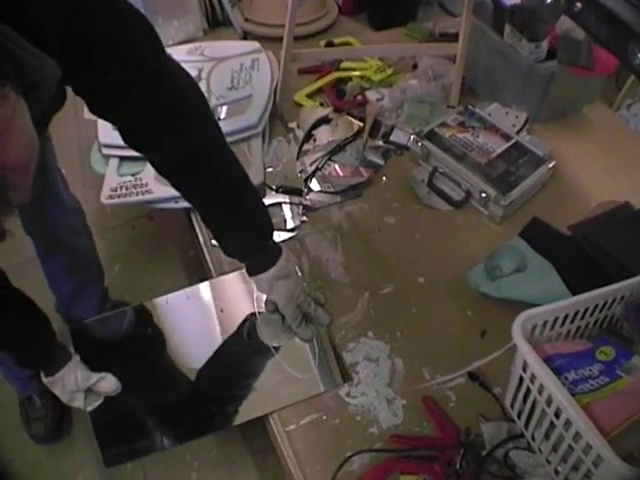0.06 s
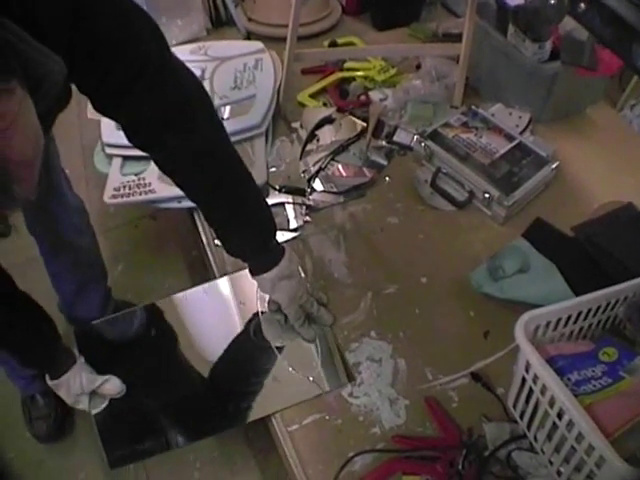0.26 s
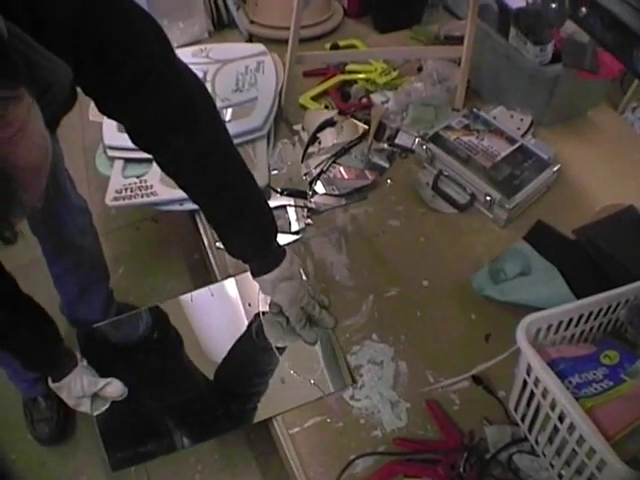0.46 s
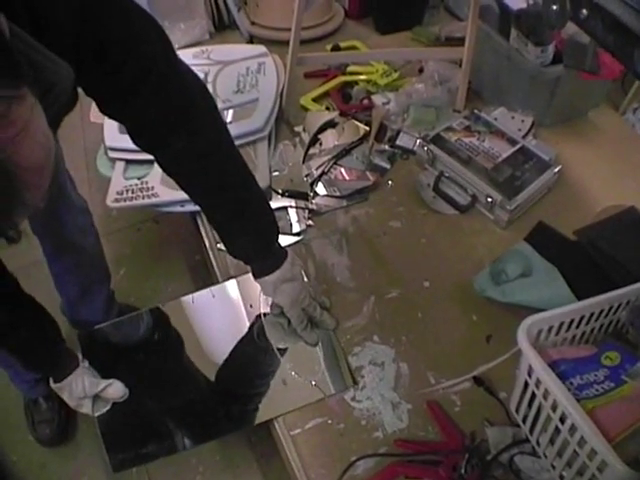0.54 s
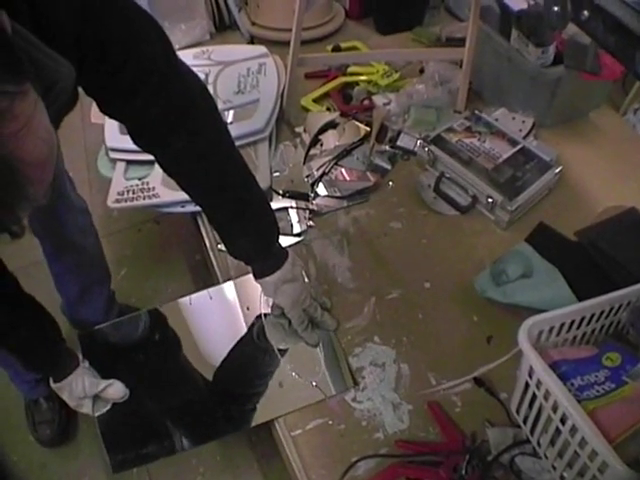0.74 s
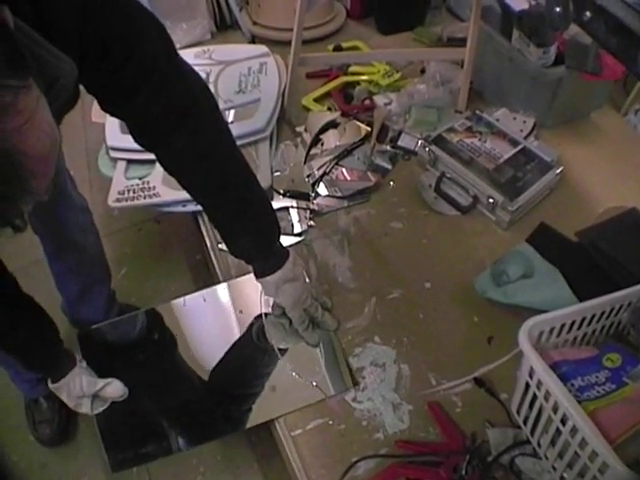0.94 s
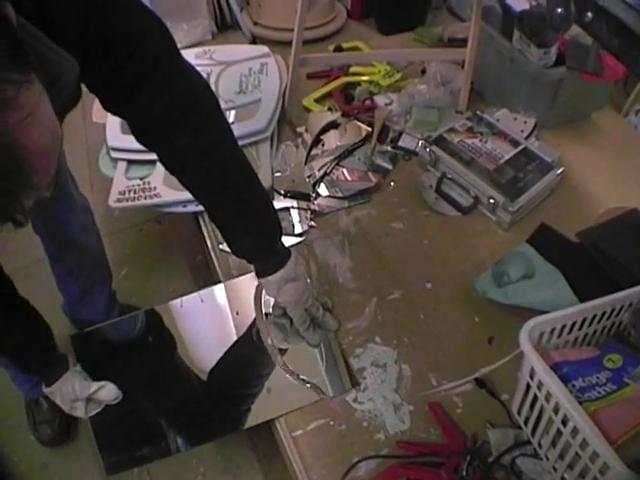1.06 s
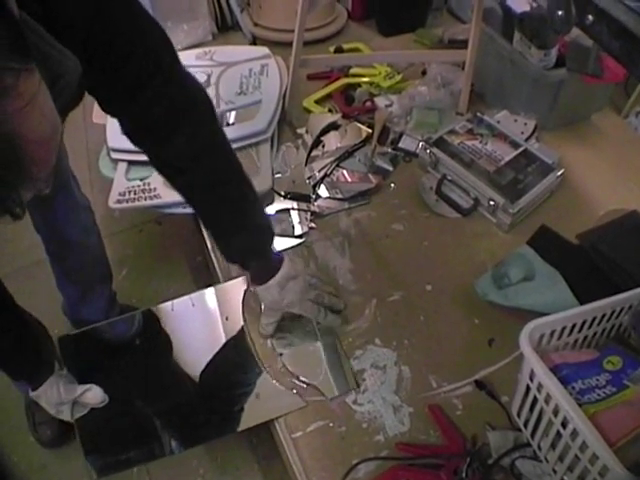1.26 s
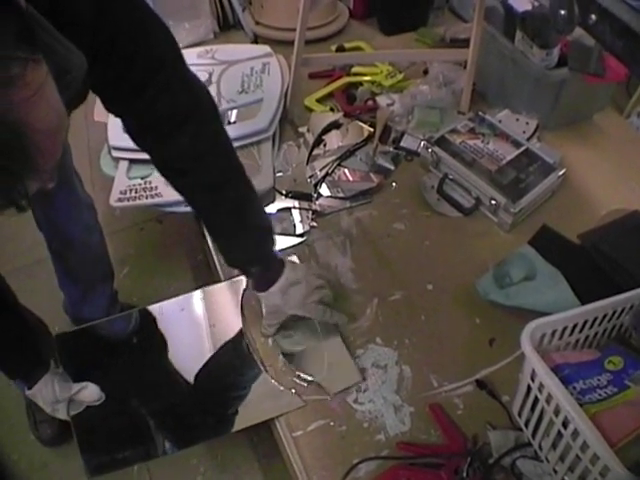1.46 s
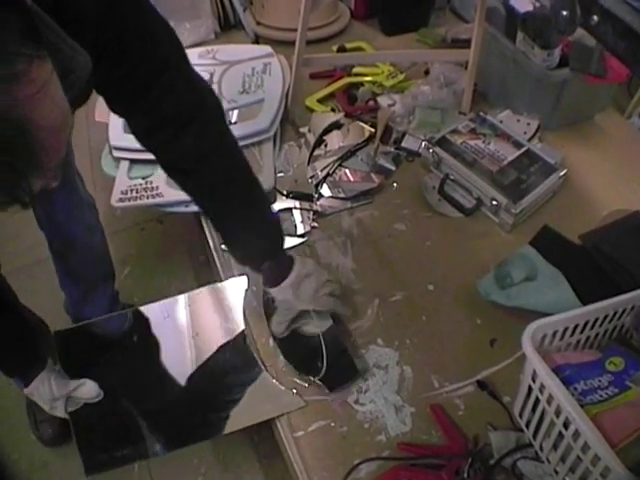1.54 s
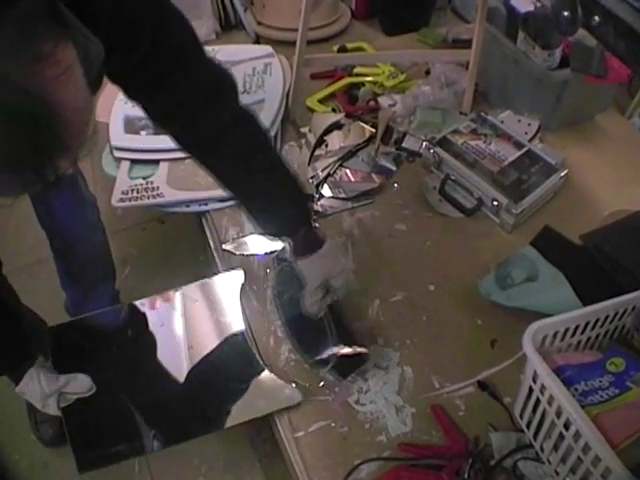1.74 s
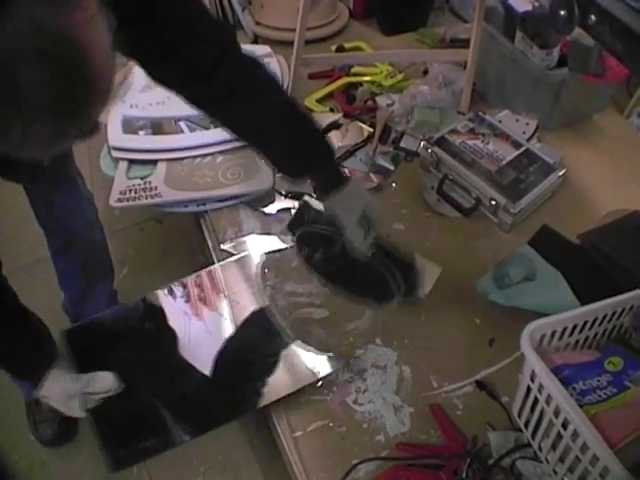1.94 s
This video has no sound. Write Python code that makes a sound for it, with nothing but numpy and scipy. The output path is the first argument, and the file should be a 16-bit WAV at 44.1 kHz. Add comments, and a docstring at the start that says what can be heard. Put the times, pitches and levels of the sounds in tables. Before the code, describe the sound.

Close up in a quiet workshop, glass cracks sharply and rings briefly with a chatter of chinks. After a short pause, the offcut scrapes over grit with small knocks, then ticks against the sheet as it is lifted.

```python
"""A loud, sharp crack and a chatter of chinks: mirror glass snapped along its score on a workshop bench.
The crack sets the sheet ringing, thumps the bench and overloads the microphone; the fresh edges
chink together. Then the offcut is dragged clear, catches on grit, knocks on the bench, ticks against
the sheet and rings faintly as it is lifted. Underneath: soft room noise and a camcorder's whine."""
import sys
import numpy as np
from scipy import signal
from scipy.fft import rfft, irfft
from scipy.io import wavfile
from scipy.ndimage import uniform_filter1d

SR = 44100
rng = np.random.default_rng(int(sys.argv[2]) if len(sys.argv) > 2 else 0)


def generate_wav(sig):
    """Save sig (samples, or channels by samples) to the path in sys.argv[1] as 16-bit PCM at SR."""
    pcm = np.round(np.clip(np.atleast_2d(sig).T, -1, 1) * 32767).astype(np.int16)
    wavfile.write(sys.argv[1], SR, pcm)


N = 88200
TIME_S = np.arange(N) / SR

# Noise spectra. Each row: frequency in Hz, relative density in dB.
FLOOR_SPECTRUM = [(25, -24.5), (100, -12.5), (260, -10.5), (700, -12), (1000, -13), (1500, -17.5),
                  (2000, -21), (3200, -27.5), (4600, -30), (5400, -32), (11000, -33.5), (16000, -43.5)]
RASP_SPECTRUM = [(900, -31), (1400, 1), (1560, 7), (2000, -35.5)]
DRAG_HISS_SPECTRUM = [(1000, -17), (3500, 1), (5200, -5), (7500, 1.5), (11000, 0), (13500, -6),
                      (16000, -25)]
DRAG_BODY_SPECTRUM = [(100, -20), (260, -1.5), (350, -13), (700, -6), (1100, -2.5), (1520, -0.5),
                      (1850, -1.5), (2400, -3.5), (3500, -12.5), (6000, -46), (16000, -31)]
TICK_BRIGHT_SPECTRUM = [(100, -27.5), (1000, -18.5), (2500, -6.5), (5200, -10), (7500, -1.5), (10000, -0.5),
                        (13000, -7), (16000, -14.5)]
TICK_BODY_SPECTRUM = [(100, -13), (700, -7.5), (1500, -3.5), (3800, -5.5), (5000, -12), (12000, -9.5),
                      (16000, -29.5)]
CHINK_SPECTRUM = [(100, -22.5), (500, -3), (1300, -7.5), (3200, -6), (5500, -9.5), (9500, -1.5),
                  (13600, -7), (16000, -32)]
CRACK_SPECTRUM = [(30, -18), (130, -32.5), (290, -13), (410, -4), (560, -10), (1050, -5), (1480, 2),
                  (1830, -10), (2300, 0.5), (3100, -3), (4300, -9.5), (6800, -11), (7700, -3), (9400, -0.5),
                  (12000, -6.5), (16000, -23.5)]

# Resonances. Each row: frequency in Hz, relative level in dB, T60 in seconds.
OFFCUT_MODES = [(1297, -55, 0.11), (1567, -48.5, 0.1), (1980, -58.5, 0.53), (2733, -55, 0.54),
                (3570, -54.5, 0.21), (4000, -61, 0.052), (10130, -58.5, 0.12)]
EDGE_MODES = [(7947, -3, 0.037), (8400, -14, .08), (8872, -8.5, 0.058), (9470, 2.5, 0.048), (10060, 0, .05),
              (9900, -8.5, 0.055), (11400, 0.5, .06), (11130, -2.5, 0.044), (10800, -9, .07),
              (11300, -11.5, .055), (13100, -14, .04), (12600, -11, .03)]
SHEET_MODES = [(227.6, -25, .33), (241.6, -32, .27), (394, -19, 0.023), (443, -24, .045), (499, -37, 0.19),
               (956, -32, .25), (1275, -21, 0.11), (1352, -20.5, .09), (1383, -13, 0.062),
               (2111, -12.5, 0.11), (2207, -30, 0.27), (2347, -12.5, .08), (2527, -28.5, .3),
               (2730, -18.5, .11), (3120, -24.5, .2), (3320, -23.5, .14)]  # the lowest two beat
THUMP_MODES = [(45.4, -32.5, .12)]
# Brief ring of a jolt. Each row: multiple of the pitch, relative level in dB, T60 in seconds.
JOLT_MODES = [(1, 0.5, 0.021), (1.5, -4, 0.015), (2.4, -32, 0.0087), (4.3, -27, 0.0067)]

# Camcorder tones. Each row: frequency in Hz, RMS level in dB.
WHINE_TONES = [(102, -72.5), (450, -71), (900, -61.5), (1500, -71.5), (2326, -77), (3898, -78.5),
               (4199, -81), (4500, -76.5), (4802, -81), (15622, -77)]
# Workshop reverb. Each row: frequency in Hz, gain in dB, T60 in seconds.
ROOM_BANDS = [(100, -20, .35), (230, -15.5, 0.81), (400, -9, 0.35), (1507, -16.5, .53), (3025, -13, 0.51),
              (5600, -8, 0.39), (8200, -20, 0.25), (12000, -24, 0.22), (15980, -26, .33)]
# Stereo width. Each row: frequency in Hz, side gain in dB.
SIDE_GAINS = [(60, -14.5), (220, -33.5), (500, -26), (1200, -25), (2800, -19.5), (5000, -11), (9000, -17.5),
              (14000, -17.5)]

# Glass biting on grit. Each row: start in seconds, length in seconds, level in dB.
RASP_EVENTS = [(1.112, .04, -53.5), (1.3, 0.062, -51.5)]
# Drag envelope. Each row: time in seconds, hiss level in dB, body level in dB.
DRAG_ENVELOPE = [(0.969, -83, -63), (1.001, -61, -67.5), (1.045, -49, -50.5), (1.125, -48, -49),
                 (1.17, -48, -52.5), (1.24, -49.5, -50), (1.28, -49, -49.5), (1.35, -53, -51.5),
                 (1.409, -58, -58.5), (1.455, -52.5, -58), (1.485, -66, -66.5), (1.55, -57, -58.5),
                 (1.588, -64.5, -72), (1.63, -68.5, -66), (1.67, -57.5, -58), (1.735, -64, -60.5),
                 (1.773, -58.5, -55), (1.84, -80, -71), (1.95, -88, -87)]
# Offcut jolts: first a sharp catch on grit at the start of a rasp, then dull knocks on the bench.
# Each row: start in seconds, level in dB, pitch in Hz.
JOLT_EVENTS = [(1.1203, -36.5, 1415), (1.2728, -45, 238), (1.2816, -37.5, 280), (1.289, -42, 410),
               (1.333, -37, 396)]
# Blows to sheet (jogs) and offcut (clinks). Each row: start in seconds, gain in dB, tilt in dB/octave.
JOG_EVENTS = [(.345, -15, -9.5), (.388, -31.5, 2), (1.002, -27.5, -6.5), (1.036, -34, -1.5),
              (1.145, -34, -3.5), (1.389, -33.5, -2), (1.514, -33, -18), (1.576, -31, -7.5)]
CLINK_EVENTS = [(1.5134, 5.5, -7), (1.5201, -10, -25), (1.7453, -1, 0.5)]
# Edge on edge. Each row: start in seconds, level in dB, body share of the power from 0 to 1.
TICK_EVENTS = [(0.088, -46.5, 0.24), (0.1069, -44, 0.18), (1.0448, -36, 0.6), (1.3992, -30, 0.25),
               (1.5056, -41.5, .4), (1.5121, -33, 0.88), (1.5206, -34.5, 1), (1.5276, -44, 0),
               (1.5397, -40, 0.3), (1.606, -35.5, 0.11), (1.6368, -41.5, 0.74), (1.6447, -44, 0.1),
               (1.717, -43, 0), (1.7441, -27, 0.04), (1.8472, -45, 0.23)]
# Edge chatter. Each row: start in seconds, level in dB, length in seconds, fade in seconds.
CHINK_EVENTS = [(0.3521, -26.5, 0.014, 0.0029), (0.367, -39, 0.009, 0.0076), (0.382, -33.5, 0.018, 0.018),
                (0.401, -36, 0.0044, 0.0068), (0.4257, -45, 0.015, 0.015), (0.49, -43, 0.0024, 0.012),
                (0.731, -60, 0.0028, 0.0036), (0.917, -62, 0.0038, .004), (0.96, -61.5, 0.0041, 0.007),
                (1.003, -44.5, 0.018, 0.0079), (1.034, -34, 0.0041, 0.0039)]


def amp(db):
    return 10 ** (np.asarray(db) / 20)


def unit_rms(x):
    return x / np.sqrt(np.mean(x ** 2) + 1e-20)


def unit_energy(x):
    return x / np.linalg.norm(x)


def lookup(table, hz, column=1):
    """Interpolate on a log-frequency axis."""
    rows = np.array(table, float)
    return np.interp(np.log(hz + 1), np.log(rows[:, 0] + 1), rows[:, column])


def add(mix, start_s, sound):
    part = mix[round(start_s * SR):][:len(sound)]
    part += sound[:len(part)]


def convolve(x, response):
    return signal.fftconvolve(x, response)[:N]


def colour(x, spectrum, size=4096):
    """Minimum-phase filter of unit energy."""
    log_gain = np.log(amp(lookup(spectrum, abs(np.fft.fftfreq(size, 1 / SR)))))
    response = np.fft.ifft(np.exp(np.conj(signal.hilbert(log_gain)))).real
    return convolve(x, unit_energy(response[:size // 2]))


def drift(rate_hz, points=512):
    """Random wander of about unit size."""
    return np.interp(TIME_S * rate_hz, np.arange(points), rng.standard_normal(points))


def ring(modes, length_s=0.5):
    """Damped modes after a blow."""
    t = np.arange(round(length_s * SR)) / SR
    return sum(amp(db - 60 * t / t60_s) * np.sin(2 * np.pi * hz * t) for hz, db, t60_s in modes)


def strike(modes, gain_db, tilt_db_per_oct):
    """A blow on glass; softer blows tilt the modes away from the treble."""
    return ring([(hz, db + gain_db + tilt_db_per_oct * np.log2(hz / modes[0][0]), t60_s)
                 for hz, db, t60_s in modes])


def burst(rise_s, length_s, fade_s, size=4096):
    """Dense run of tiny fractures or contacts: rise, hold, fade."""
    t = np.arange(size) / SR
    envelope = np.minimum(t / rise_s, 1) * np.exp(-np.maximum(t - length_s, 0) / fade_s)
    x = rng.standard_normal(size) * envelope
    for _ in range(3):
        flat = irfft(np.exp(1j * np.angle(rfft(x))), size)
        local_rms = np.sqrt(abs(uniform_filter1d(flat ** 2, size=128)) + 1e-12)
        x = envelope * flat / local_rms
    return x


def room_noise(level_db=-60):
    """Soft, steady noise floor."""
    return amp(level_db) * unit_rms(colour(rng.standard_normal(N), FLOOR_SPECTRUM))


def whine(waver_depth=0.081, waver_rad=0.25, waver_hz=14):
    """Camcorder tones, wavering in level and phase."""
    out = np.zeros(N)
    for hz, db in WHINE_TONES:
        envelope = amp(db) * np.sqrt(2) * (1 + waver_depth * drift(waver_hz))
        out += envelope * np.sin(2 * np.pi * hz * TIME_S + waver_rad * drift(waver_hz))
    return out


def reverb(x, onset_s=0.004):
    """Workshop tail; each band decays at its own rate."""
    hz, t, bands = signal.stft(rng.standard_normal(SR), SR, nperseg=256)
    t60_s = lookup(ROOM_BANDS, hz, column=2)[:, None]
    decay = amp(lookup(ROOM_BANDS, hz)[:, None] - 60 * t / t60_s)
    energy_norm = np.sqrt(np.log(1e6) / t60_s / SR)
    tail = signal.istft(bands * decay * energy_norm, SR, nperseg=256)[1]
    build_up = 1 - np.exp(-(TIME_S[:len(tail)] / onset_s) ** 2)
    return convolve(x, tail * build_up)


def rasps():
    """Runs of small slips excite one narrow resonance of the sliding glass."""
    slips = np.zeros(N)
    for start_s, length_s, db in RASP_EVENTS:
        add(slips, start_s, amp(db) * burst(rise_s=0.01, length_s=length_s, fade_s=0.015, size=8192))
    return colour(slips, RASP_SPECTRUM)


def drag(grains_per_s=10000, spread_db=2, flutter_db=1.24, flutter_hz=120, edge_db=-14):
    """Grit catches and slips under the sliding offcut."""
    times_s, hiss_db, body_db = np.transpose(DRAG_ENVELOPE)
    sizes = amp(spread_db * np.minimum(rng.exponential(1, (2, N)), 5))
    signs = rng.choice([-1., 1.], (2, N))
    hits = rng.random((2, N)) < grains_per_s / SR
    grains = unit_rms(sizes * signs * hits) * amp(flutter_db * drift(flutter_hz)) * (TIME_S > times_s[0])
    fine = grains[0] * amp(np.interp(TIME_S, times_s, hiss_db))
    coarse = grains[1] * amp(np.interp(TIME_S, times_s, body_db))
    edges = amp(edge_db) * convolve(fine, unit_energy(ring(EDGE_MODES)))
    return colour(fine, DRAG_HISS_SPECTRUM) + edges + colour(coarse, DRAG_BODY_SPECTRUM)


def handling(highpass_hz=110):
    """The offcut catches on grit and knocks on the bench; the chattering edges and later the moving offcut jog
    the sheet, and the offcut clinks against it."""
    out = np.zeros(N)
    for start_s, db, pitch_hz in JOLT_EVENTS:
        modes = [(pitch_hz * ratio, mode_db, t60_s) for ratio, mode_db, t60_s in JOLT_MODES]
        add(out, start_s, amp(db) * ring(modes))
    for modes, events in (SHEET_MODES, JOG_EVENTS), (OFFCUT_MODES, CLINK_EVENTS):
        for start_s, db, tilt_db_per_oct in events:
            add(out, start_s, strike(modes, db, tilt_db_per_oct))
    return signal.sosfilt(signal.butter(2, highpass_hz, "high", fs=SR, output="sos"), out)


def ticks(fade_s=0.0002, firm_extra_s=0.00058, rattle_db=-12.5, rattle_s=0.0074):
    """Single contacts with a brief rattle; firmer ones last longer and reach the body of the glass."""
    bright, body = np.zeros((2, N))
    t = TIME_S[:SR // 10]
    for start_s, db, share in TICK_EVENTS:
        contact = np.exp(-t / (fade_s + firm_extra_s * share))
        rattle = amp(rattle_db) * np.exp(-t / rattle_s)
        noise = amp(db) * (contact + rattle) * rng.choice([-1., 1.], (2, len(t)))
        add(bright, start_s, np.sqrt(1 - share) * noise[0])
        add(body, start_s, np.sqrt(share) * noise[1])
    return colour(bright, TICK_BRIGHT_SPECTRUM) + colour(body, TICK_BODY_SPECTRUM)


def chinks(rise_s=0.0016, ring_db=-3.5, grit_db=-3, detune=0.0015, grain_db=3, grain_hz=1200):
    """The fresh edges chatter; each touch is at another spot and detunes their modes slightly."""
    contacts, ringing = np.zeros((2, N))
    for start_s, db, length_s, fade_s in CHINK_EVENTS:
        chatter = amp(db) * burst(rise_s, length_s, fade_s)
        chatter *= unit_rms(amp(grain_db * drift(grain_hz, points=4096)))[:len(chatter)]
        modes = [(hz * rng.normal(1, detune), mode_db, t60_s) for hz, mode_db, t60_s in EDGE_MODES]
        add(contacts, start_s, chatter)
        add(ringing, start_s, convolve(chatter, unit_energy(ring(modes, length_s=0.1))))
    return amp(ring_db) * ringing + amp(grit_db) * colour(contacts, CHINK_SPECTRUM)


def snap(start_s=0.2321, crack_db=2.5, ring_delay_s=0.0018):
    """The crack runs the score; the freed sheet and its edges ring, and the bench takes the recoil."""
    out = np.zeros(N)
    fracture = burst(rise_s=0.00061, length_s=0.0054, fade_s=0.0023)
    edges = strike(EDGE_MODES, gain_db=-10, tilt_db_per_oct=-10)
    add(out, start_s, amp(crack_db) * colour(fracture, CRACK_SPECTRUM))
    add(out, start_s + ring_delay_s, ring(SHEET_MODES) + edges + ring(THUMP_MODES))
    return out


def scene(reverb_side_db=5, noise_side_db=-7):
    """Mid/side mix: glass near the centre, a little width from reverb and room noise."""
    glass = snap() + chinks() + ticks() + handling() + drag() + rasps()
    mid = glass + reverb(glass) + whine() + room_noise()
    side_spectrum = 1j * rfft(glass) + amp(reverb_side_db) * rfft(reverb(glass))  # 1j: 90 degree shift
    width = amp(lookup(SIDE_GAINS, np.fft.rfftfreq(N, 1 / SR)))
    side = irfft(side_spectrum * width, N) + amp(noise_side_db) * room_noise()
    return np.array([mid + side, mid - side])


def record(dry, threshold_db=-14, duck_db_per_db=0.31, recover_db_per_s=4, ceiling=0.8, cutoff_hz=16300):
    """Gain control ducks after the crack, the peak overloads, then a low-pass limits the band."""
    smoothing = 1 / 200  # per sample
    power = signal.lfilter([smoothing], [1, smoothing - 1], (dry ** 2).mean(0))
    excess_db = np.maximum(10 * np.log10(power + 1e-12) - threshold_db, 0)
    recovery_db = TIME_S * recover_db_per_s
    duck_db = np.maximum.accumulate(excess_db * duck_db_per_db + recovery_db) - recovery_db
    drive = dry * amp(-duck_db) / ceiling
    clipped = ceiling * drive / (1 + drive ** 6) ** (1 / 6)
    lowpass = signal.firwin(255, cutoff_hz, window=("kaiser", 8), fs=SR)
    return signal.oaconvolve(clipped, lowpass[None], "same")


dry = scene()
out = record(dry)
generate_wav(out)
```